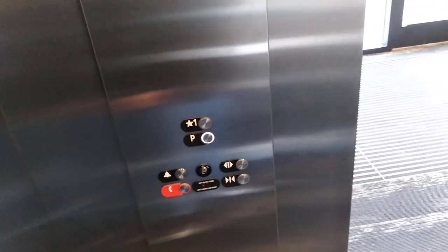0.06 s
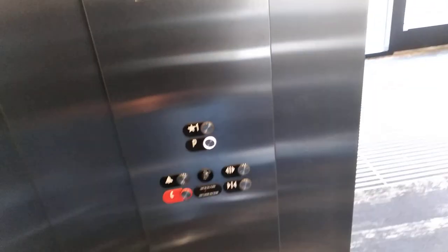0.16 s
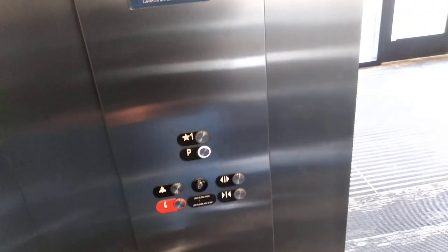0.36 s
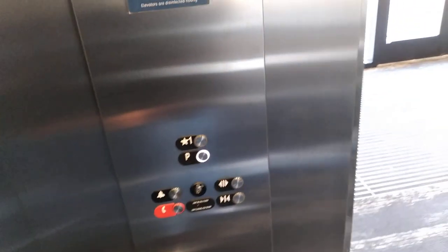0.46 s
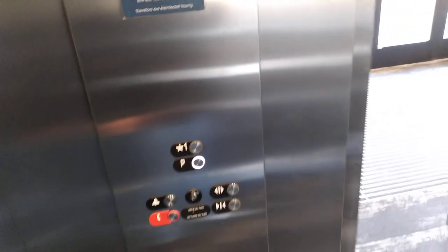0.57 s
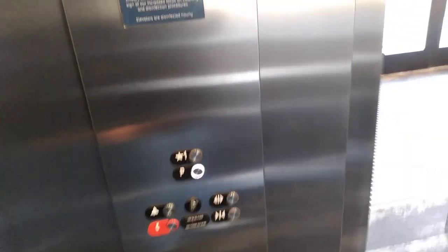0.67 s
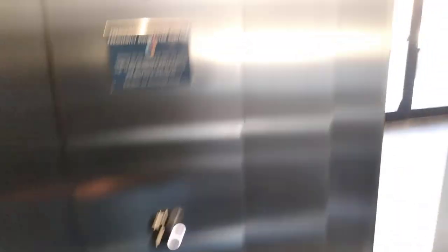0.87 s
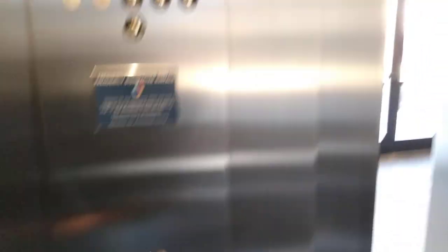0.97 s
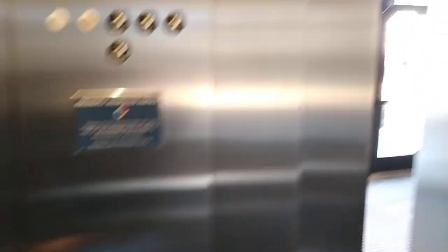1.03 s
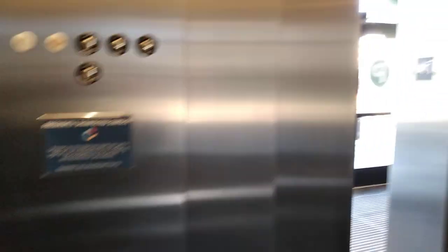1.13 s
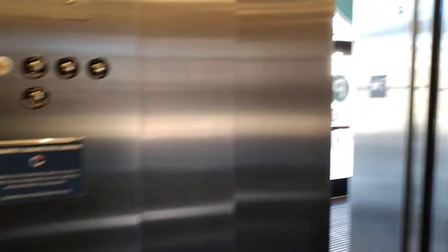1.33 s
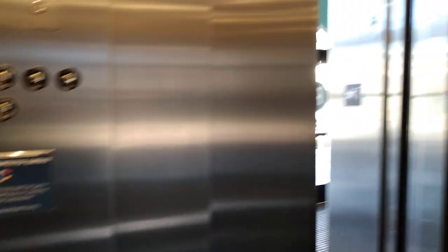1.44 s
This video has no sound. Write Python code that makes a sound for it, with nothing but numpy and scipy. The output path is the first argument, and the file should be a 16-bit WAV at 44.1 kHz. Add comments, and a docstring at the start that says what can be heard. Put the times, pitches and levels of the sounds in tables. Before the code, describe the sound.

An elevator door latch clacks twice, ringing off steel walls above a steady hum.

```python
"""Inside a steel elevator car a fan hums throughout, at first with a thin electrical whine.
At 0.22 s the door latch scrapes over its keeper and drops with a bright clack; at 0.48 s a heavier
catch follows. Each clack is a cluster of impacts that rings the metal and echoes between the walls,
while the car booms, the door panel bumps and the linkage ticks and rubs. After a dull thud under the
floor, a motor takes up its low drone near 1 s, and at 1.4 s a soft sliding hiss sets in."""
import sys
import numpy as np
from scipy import signal
from scipy.fft import rfft, irfft
from scipy.io import wavfile
from scipy.ndimage import uniform_filter1d

SR = 44100
rng = np.random.default_rng(int(sys.argv[2]) if len(sys.argv) > 2 else 0)


def wav_out(sig):
    """Save sig, one row per channel (or a flat mono array), as 16-bit PCM at SR to the path in sys.argv[1]."""
    wavfile.write(sys.argv[1], SR, np.round(np.clip(np.atleast_2d(sig).T, -1, 1) * 32767).astype(np.int16))


N = 66150
T, HZ = np.arange(N) / SR, np.fft.rfftfreq(N, 1 / SR)

# Balance of the two microphones. Each row: frequency in Hz, left minus right in dB.
BALANCE = [(60, -.5), (200, 1), (700, 0), (1300, 1.45), (2400, 3.5), (3600, 1.03), (4600, -3), (6300, -8),
           (7400, -18), (8400, -28), (9500, -26), (11000, -14), (15000, -9)]
# Likeness of the sound at the two microphones. Each row: frequency in Hz, coherence from 0 to 1.
COHERENCE = [(50, 1), (130, 0.85), (280, 0.84), (500, 0.75), (1000, 0.092), (2000, 0.0082), (15000, 0.084)]
# Decay of the first echoes and of the tail. Each row: frequency in Hz, time to fall 60 dB in seconds.
EARLY_DECAY = [(150, 0.67), (450, 0.51), (1000, 0.31), (2500, 0.21), (5000, 0.34), (8500, 0.12),
               (14000, 0.19)]
LATE_DECAY = [(150, 0.49), (450, 0.82), (1000, 0.47), (2500, 0.83), (5000, 0.69), (8500, 0.51),
              (14000, 0.49)]
# Echo growth, slowest for the heavy panels. Each row: frequency in Hz, base time constant in seconds.
ECHO_RISE = [(200, 0.015), (900, 0.013), (2500, 0.0058), (5000, 0.0011), (9000, 0.00164)]

# Spectra of the air, hiss and friction noises. Each row: frequency in Hz, relative density in dB.
AIR_SPECTRUM = [(25, -34), (50, -15), (100, -25), (150, -16), (200, -28), (320, -23), (400, -32.5),
                (470, -28.5), (570, -32.5), (700, -34), (1200, -44), (3260, -48), (4500, -56),
                (5600, -55.5), (7500, -54), (9000, -42.5), (11000, -60), (15000, -70)]
WHINE_SPECTRUM = [(3000, -32), (4000, -11), (4300, 5), (4700, 7), (5000, -9), (5400, -18), (7500, -9),
                  (8700, 6), (10000, -19), (15000, -35)]
SLIDE_SPECTRUM = [(1180, -48), (2000, -6), (2370, -6.5), (2820, -10.5), (3230, -8), (3740, -15), (4290, -9),
                  (4830, -13), (5220, -1.5), (7050, -6.5), (9840, 2), (11200, -6), (12500, -5.5),
                  (15500, -16)]
RUB_SPECTRUM = [(1500, -11), (2600, -10.5), (4000, -20), (6000, -7), (7500, -13.5), (8800, 1.5),
                (10000, -10), (11500, -27), (15000, -42.5)]
SCRAPE_SPECTRUM = [(600, -15), (1300, -2), (1900, -1), (3500, 4.5), (5000, 1), (7000, 0), (8800, 0.5),
                   (10500, -16), (15000, -35)]
# Tones of the fan and the motor. Each row: frequency in Hz, base rms level in dB.
FAN_TONES = [(167, -68.5), (221, -76), (336, -69), (448, -80.5)]
MOTOR_OVERTONES = [(86.2, -61), (103, -62.5)]
# Swell of the motor's fundamental. Each row: time in seconds, gain in dB.
MOTOR_SWELL = [(0, -50), (.9, -38), (.96, -15), (.995, -13), (1.02, -4), (1.13, -3), (1.2, 0), (1.3, 0),
               (1.36, 2), (1.42, -4), (1.5, -4)]
# Rubs of the linkage. Each row: centre in seconds, half length in seconds, level in dB.
RUB_SWELLS = [(0.481, 0.081, -55.5), (0.736, 0.055, -59)]

# Impacts on the car and its door gear. Each row: start in seconds, relative level in dB.
BODY_JOLTS = [(.152, -21), (0.221, -3.5), (0.281, 1), (0.307, -0.5), (.352, 2), (.412, -5), (0.484, -1.5),
              (0.541, -5), (0.592, 1), (0.659, -3.5)]
PANEL_BUMPS = [(.052, 6), (.078, -2), (.143, 3.5), (.585, 10), (.665, -8), (1.39, -1)]
LINKAGE_TICKS = [(.307, -13), (.604, 2.5), (.834, -15.5), (.908, -22)]
LATCH_CONTACTS = [(.2245, -3.5), (.228, 0.5), (.305, -18)]
CATCH_CONTACTS = [(.472, -10.5), (.477, -2), (.483, -1), (.488, -1.5), (.497, -8.5), (.645, -21.5)]
# Spectra of the impacts. Each row: frequency in Hz, relative density in dB.
BUMP_SPECTRUM = [(150, -8), (230, -15), (300, -2), (470, 11), (560, 5), (800, -42), (2000, -43),
                 (15000, -79)]
TICK_SPECTRUM = [(100, -37), (2000, 2), (5000, -6), (8500, -6.5), (10500, -14), (15000, -21)]
LATCH_SPECTRUM = [(88, -22), (150, 0), (193, -16.5), (314, 0), (411, -2), (519, -14.5), (643, -8.5),
                  (1090, -10.5), (1320, -21), (1980, -8.5), (3040, -15.5), (4560, -12), (5870, -13.5),
                  (6730, -7.5), (9000, -0.5), (10300, -21), (15500, -34.5)]
CATCH_SPECTRUM = [(88, -38.5), (150, -6.5), (204, -38.5), (257, -13.5), (371, -12), (433, -9.5), (545, -14),
                  (649, -2.5), (714, -14.5), (850, -17), (1030, -10.5), (1180, -16.5), (1400, -16.5),
                  (1700, -17), (1950, -13), (2500, -12), (3400, -17.5), (4050, -16.5), (4370, -19),
                  (6300, -23), (8410, -12), (11000, -31.5), (15000, -45.5)]
# Normal modes. Each row: frequency in Hz, relative level in dB, time to fall 60 dB in seconds.
BODY_RESONANCES = [(51.3, -0.5, 0.22), (88, -1, 0.21), (103.6, -1.5, 0.22), (141, -8, 0.23),
                   (164, -17, 0.088), (256.3, -13.5, 0.4)]
LATCH_RESONANCES = [(287, -7.5, 0.44), (398, -9, 0.48), (2086, -8, 0.5), (4770, 1, 0.15), (8080, -24, .45),
                    (8419, -3, 0.18), (9500, -11, .27), (9000, 4, 0.18)]
PANEL_RESONANCES = [(280, -8, .3), (333, -7, .33), (364, -9, .48), (424, -5, .25), (441, 2, .34),
                    (493, -10, .38), (517, -10, .45), (596, -10, .42), (641, -6, .36), (1040, -7, .2),
                    (1948, -16, .5), (2418, -13, .5), (2557, -13, .5), (4128, -12, .44), (8105, -12, .3),
                    (8440, -13, .32)]


def amp(db):
    """Amplitude grows tenfold for every 20 dB."""
    return 10 ** (np.asarray(db) / 20)


def unit(x):
    """Normalisation to an rms of 1."""
    return x / np.sqrt(np.mean(x ** 2) + 1e-20)


def read(table, hz):
    """Interpolation on a logarithmic frequency axis."""
    table_hz, value = np.transpose(table)
    return np.interp(np.log(hz + 1), np.log(table_hz + 1), value)


def add(mix, start_s, sound):
    """Superposition: a sound adds to the mix from its start onward."""
    part = mix[:, max(round(start_s * SR), 0):]
    part += sound[..., :part.shape[1]]


def coherence(hz):
    """Spatial coherence: long waves reach both microphones alike, short ones do not."""
    return np.clip(read(COHERENCE, hz), 0, 1)


def stereo_gains(hz):
    """Level difference between left and right, at constant power of their mean."""
    left = amp(read(BALANCE, hz))
    return np.array([left, np.ones_like(left)]) * 2 / np.sqrt(1 + left ** 2 + 2 * coherence(hz) * left)


def noise():
    """Partially coherent white noise at two microphones, alike in the bass."""
    common, separate = rfft(rng.standard_normal((2, N)))
    same = coherence(HZ)
    return irfft(np.array([common, same * common + np.sqrt(1 - same ** 2) * separate]), N)


def causal(x, gain):
    """A minimum-phase filter applies a gain per frequency with no ringing ahead of the sound."""
    cepstrum = irfft(np.log(gain + 1e-5), N)
    folded = cepstrum * (1 + np.sign(np.fft.fftfreq(N)))
    taps = irfft(np.exp(rfft(folded)), N)[:, :4096]
    return signal.fftconvolve(x, taps, axes=1)[:, :N]


def coloured(x, spectrum, low_hz):
    """Spectral shaping: a spectrum with a bass roll-off, at unit power, then the stereo balance."""
    gain = amp(read(spectrum, HZ)) / np.sqrt(1 + (low_hz / (HZ + 1)) ** 8)
    return causal(x, unit(gain) * stereo_gains(HZ))


def rippled(x, ripple_db=2, width_hz=40):
    """Countless narrow resonances of the steel ripple the spectrum differently at each microphone."""
    ripple = uniform_filter1d(rng.standard_normal((2, len(HZ))), int(width_hz / HZ[1]))
    depth_db = ripple_db * (1 - coherence(HZ)) ** 2
    mean_power = np.exp(2 * np.log(amp(depth_db)) ** 2)
    return causal(x, amp(depth_db * unit(ripple)) / np.sqrt(mean_power))


def drift(rate_hz):
    """Low-passed noise gives a random fluctuation of zero mean and rms 1."""
    return unit(irfft(rfft(rng.standard_normal(N)) * np.exp(-(HZ / rate_hz) ** 2) * (HZ > 0), N))


def tone(hz, db, waver, flutter_db):
    """A sinusoid under random modulation of frequency (by the fraction waver) and of level."""
    cycles = np.cumsum(hz * (1 + waver * drift(13.1))) / SR
    return np.sqrt(2) * amp(db + flutter_db * drift(8.3)) * np.sin(2 * np.pi * cycles)


def ring(modes, rise_s):
    """Damped normal modes; the higher ones reach the two microphones out of phase."""
    out = np.zeros((2, N))
    for hz, db, t60 in modes:
        phase = np.arccos(coherence(hz)) * rng.choice([-1, 1]) * np.array([[-.5], [.5]])
        envelope = amp(db) * np.exp(-np.log(1000) * T / t60)
        out += stereo_gains(hz)[:, None] * envelope * np.sin(2 * np.pi * hz * T + phase)
    return out * (1 - np.exp(-T / rise_s))


def wall_echoes(tail_db, rise_scale, spread_db=3.5):
    """Reverberation: uneven reflections off the steel walls build up, then decay into a weaker tail."""
    uneven = amp(spread_db * np.clip(drift(1850), -2, 2) * np.exp(-T / 0.041))
    hz, t, bands = signal.stft(noise() * uneven, SR, nperseg=256)
    early = np.exp(-np.log(1000) * t / read(EARLY_DECAY, hz)[:, None])
    late = np.exp(-np.log(1000) * t / read(LATE_DECAY, hz)[:, None])
    rise = 1 - np.exp(-t / (rise_scale * read(ECHO_RISE, hz)[:, None]))
    envelope = np.hypot(early, amp(tail_db) * late) * rise
    envelope /= np.linalg.norm(envelope, axis=1, keepdims=True)  # equal energy in every band
    return signal.istft(bands * envelope, SR, nperseg=256)[1][:, :N]


def impacts(contacts, spectrum, low_hz, tail_db, rise_scale):
    """Impulsive excitation: each contact gives a bright direct crack and its echoes."""
    out = np.zeros((2, N))
    for start_s, db in contacts:
        echoes = wall_echoes(tail_db, rise_scale)
        crack = np.diff(noise(), prepend=0) * np.exp(-T / 0.0014)
        add(out, start_s, amp(db) * (unit(echoes) + amp(-5) * unit(crack)) / np.sqrt(N))
    return rippled(coloured(out, spectrum, low_hz))


def fan():
    """Broadband noise of moving air lies under the fan's wavering tones."""
    air = amp(-62 + drift(24)) * coloured(noise(), AIR_SPECTRUM, low_hz=31.3)
    return air + sum(tone(hz, db, waver=0.0082, flutter_db=4) for hz, db in FAN_TONES)


def whine(end_s=0.2, fade_s=0.017):
    """An electrical tone over narrow-band hiss; both cease just before the latch."""
    line = tone(hz=3630, db=-81, waver=.003, flutter_db=3)
    hiss = amp(-78.5) * coloured(noise(), WHINE_SPECTRUM, low_hz=3000)
    return (line + hiss) * np.clip((end_s - T) / fade_s, 0, 1)


def motor(overtone_growth=1.83):
    """Nonlinear growth: the overtones swell faster than the fundamental, so the drone roughens."""
    swell_db = np.interp(T, *np.transpose(MOTOR_SWELL))
    overtones = sum(tone(hz, db + overtone_growth * swell_db, waver=0.022, flutter_db=4)
                    for hz, db in MOTOR_OVERTONES)
    return tone(hz=43.1, db=-48 + swell_db, waver=.006, flutter_db=.7) + overtones


def slide(start_s=1.396, rise_s=.022, fade_db_per_s=84):
    """Sliding friction makes a hiss that starts quickly and decays exponentially."""
    age = np.maximum(T - start_s, 0)
    envelope = np.minimum(age / rise_s, 1) * amp(-56.5 - fade_db_per_s * age + drift(120))
    return rippled(coloured(noise() * envelope, SLIDE_SPECTRUM, low_hz=2500))


def floor_thud(centre_s=.888, half_length_s=.013, hz=85):
    """A Gaussian wave packet: a few smooth cycles of bass under the floor."""
    t = T - centre_s
    return amp(-49) * np.exp(-(t / half_length_s) ** 2) * np.sin(2 * np.pi * hz * t)


def car_body():
    """Free vibration: every jolt sets the low modes of the car booming."""
    out = np.zeros((2, N))
    for start_s, db in BODY_JOLTS:
        add(out, start_s, amp(-40.5 + db) * ring(BODY_RESONANCES, rise_s=0.0031))
    return out


def panel_bumps():
    """Soft impacts of the door panel carry little energy at high frequencies."""
    return amp(-32.5) * impacts(PANEL_BUMPS, BUMP_SPECTRUM, low_hz=141, tail_db=-20, rise_scale=0.27)


def linkage_rubs():
    """Friction in the travelling linkage gives grainy noise that swells and fades."""
    envelope = sum(amp(db) * np.exp(-((T - centre_s) / half_s) ** 2)
                   for centre_s, half_s, db in RUB_SWELLS)
    return coloured(noise() * envelope * amp(3.6 * drift(300)), RUB_SPECTRUM, low_hz=1500)


def linkage_ticks():
    """Light impacts in the linkage radiate mainly treble."""
    return amp(-21.5) * impacts(LINKAGE_TICKS, TICK_SPECTRUM, low_hz=500, tail_db=-26, rise_scale=2.5)


def latch_scrape(start_s=0.204, release_s=0.2274, growth_db_per_s=947):
    """Friction noise of the latch on its keeper grows exponentially until the latch lets go."""
    sliding = (T > start_s) * np.exp(-np.maximum(T - release_s, 0) / 0.012)
    growth = amp(-46 + growth_db_per_s * np.minimum(T - release_s, 0) + 1.1 * drift(600))
    return coloured(noise() * sliding * growth, SCRAPE_SPECTRUM, low_hz=600)


def latch():
    """Impact excitation: the latch drops with a bright clack and rings in its own modes."""
    out = amp(-1.5) * impacts(LATCH_CONTACTS, LATCH_SPECTRUM, low_hz=170, tail_db=-8.5, rise_scale=1.2)
    add(out, start_s=.227, sound=amp(-40) * ring(LATCH_RESONANCES, rise_s=.012))
    return out


def catch():
    """Impact excitation: the heavier catch strikes in a quick cluster and rings the door panel."""
    out = amp(2.5) * impacts(CATCH_CONTACTS, CATCH_SPECTRUM, low_hz=129, tail_db=-9.5, rise_scale=0.24)
    add(out, start_s=.479, sound=amp(-28.5) * ring(PANEL_RESONANCES, rise_s=.012))
    return out


def scene():
    """Superposition: the pressures of all sources in the car add."""
    door_gear = latch() + catch() + linkage_ticks() + panel_bumps() + latch_scrape() + linkage_rubs()
    return door_gear + car_body() + floor_thud() + fan() + whine() + motor() + slide()


def record(dry, low_hz=32, high_hz=15750):
    """Band limiting: the microphones roll off the bass and a steep low-pass bounds the treble."""
    high_pass = signal.butter(4, low_hz, "high", fs=SR, output="sos")
    low_pass = signal.firwin(511, high_hz, window=("kaiser", 9), fs=SR)
    return signal.oaconvolve(signal.sosfilt(high_pass, dry), low_pass[None], "same")


dry = scene()
out = record(dry)
wav_out(out)
```